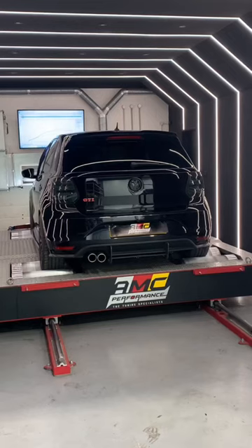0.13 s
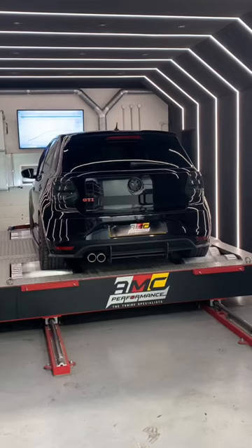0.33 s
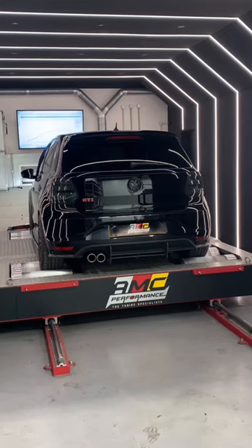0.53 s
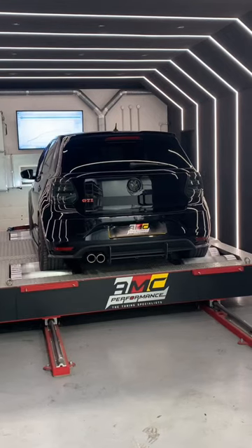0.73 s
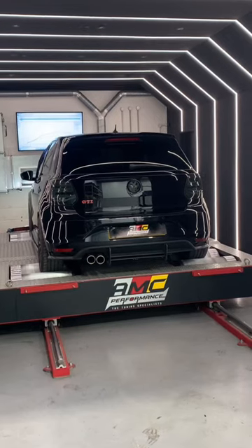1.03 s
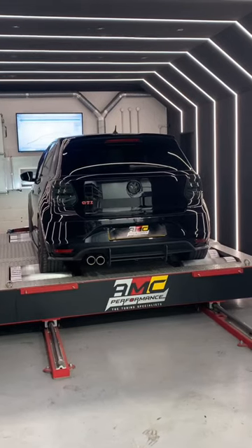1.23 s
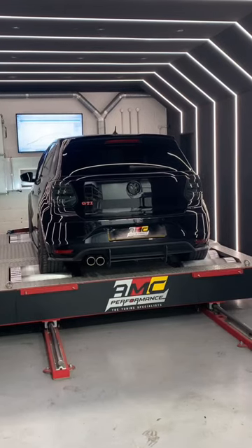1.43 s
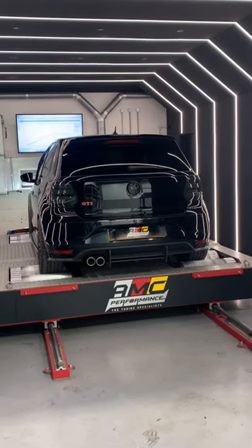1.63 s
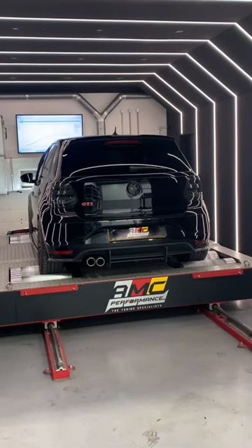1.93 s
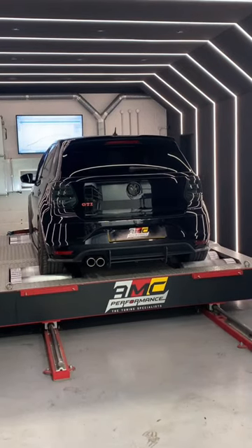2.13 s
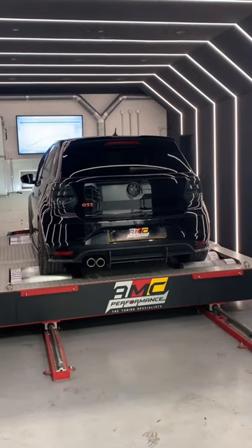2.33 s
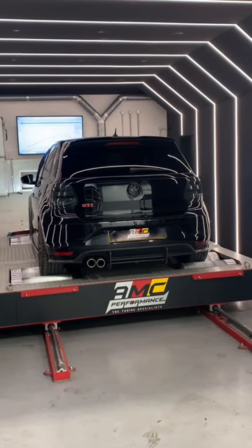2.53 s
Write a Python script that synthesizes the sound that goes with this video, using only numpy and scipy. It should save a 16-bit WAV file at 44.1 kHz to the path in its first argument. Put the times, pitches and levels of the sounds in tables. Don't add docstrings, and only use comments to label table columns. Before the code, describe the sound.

Turbo car exhaust roars upward, pops and burbles between gears, then settles into a quieter drone.

```python
import sys
import numpy as np
from scipy import signal
from scipy.fft import rfft, irfft, next_fast_len
from scipy.io import wavfile
from scipy.ndimage import map_coordinates

SR = 44100
rng = np.random.default_rng(int(sys.argv[2]) if len(sys.argv) > 2 else 0)


def boost(x):
    u = np.asarray(x, float) / 20
    return 10 ** u


def persist_wave(psi):
    counts = np.round(np.clip(psi, -1, 1) * 32767).astype(np.int16)
    wavfile.write(sys.argv[1], SR, np.atleast_2d(counts).T)


N = 119070

# frequency in Hz, density in dB per Hz.
ROAR_SPECTRUM = [(24, -48), (40, -8), (157, -18), (268, 0.5), (386, -5.5), (443, 1.5), (545, -1.5),
                 (648, -4.5), (2500, -13.5), (3250, -30.5), (5500, -120)]
# frequency in Hz, density in dB per Hz.
RASP_SPECTRUM = [(530, -5.5), (900, -9.5), (4540, -6.5), (6010, -11.5), (6950, -13), (9200, -14),
                 (11200, -20.5), (13900, -23.5), (16500, -26)]
# frequency in Hz, density in dB per Hz.
SPIT_SPECTRUM = [(3000, -43), (6000, -2), (11000, 0), (16500, -5)]

ROAR_FROM_HZ, RASP_DB = 200, 6
SPIT_SCATTER_DB, SPIT_SHARE, SPIT_SHARP = 3.5, 0.75, 6.6


def unit(x):
    return x / np.sqrt(np.mean(x ** 2) + 1e-20)


def along(points, hz):
    f, v = np.transpose(points)
    return np.interp(np.log(hz + 1), np.log(f + 1), v)


def curves(rows, fade_s=0.017):
    s, *cols = np.transpose(rows)
    t = np.arange(N) / SR
    gate = np.clip(np.minimum(t - s[0], s[-1] - t) / fade_s + 1, 0, 1)
    return [np.interp(t, s, c) for c in cols] + [gate]


def wobble(rate):
    knots = rng.standard_normal(400)
    coarse = map_coordinates(knots, [np.arange(N // 30 + 1) * 30 * rate / SR])
    return np.repeat(coarse, 30)[:N]


def filtered(x, response):
    m = next_fast_len(N + SR // 2)
    return irfft(rfft(x, m) * response(np.fft.rfftfreq(m, 1 / SR)), m)[..., :N]


def pipe(hz, peaks):
    return boost(sum(db / (1 + (2 * (hz - c) / w) ** 2) for c, w, db in peaks))


def pull(rows, orders):
    # frequency in Hz, width in Hz, gain in dB.
    resonances = [(92.5, 4.8, -13.5), (119, 2.4, 10), (193, 5.5, -9), (278.4, 16, 8.5), (320.8, 4.9, 3),
                  (338.8, 7.1, 6.5), (445.1, 23.4, 12.5), (460, 8.8, 12), (554.2, 3.4, 7), (654, 12.7, 14),
                  (764.2, 7.8, 15.5), (978, 14, 15)]
    # centre in seconds, order, half length in seconds, gain in dB.
    swells = [(0.13, 3, 0.065, -2), (0.24, 2, 0.059, 1.5), (0.404, 3, 0.047, 4.5), (0.38, 4, 0.081, -8.5),
              (0.243, 4, 0.036, 4.5), (0.835, 7, .06, -12), (2.28, 8, 0.051, -9), (1.25, 6, 0.017, 8),
              (0.77, 4, 0.032, -5), (0.78, 6, 0.051, 6.5), (0.93, 7, 0.028, -7.5), (1.012, 3, 0.063, -14),
              (1.075, 4, 0.037, 6.5), (1.132, 3, 0.05, 3), (1.29, 4, 0.053, -14), (1.444, 1, .06, 4),
              (1.71, 3, 0.036, 3), (1.78, 3, 0.028, -12.5), (1.78, 5, 0.035, -6), (2.1, 2, .04, -3.5),
              (2.1, 6, 0.035, 8), (2.327, 2, .04, -8), (2.25, 1, 0.32, 2.5), (2.68, 1, 0.061, -18)]
    hz, hum_db, rasp_db, tilt_db, spit_db, gate = curves(rows)
    turns = np.cumsum(hz) / SR
    t = np.arange(N) / SR
    quarter_turn = np.array([[0], [1]]) / 4
    hum = 0
    for k, db in orders:
        sway_db = 0.5 * np.array([wobble(7.16), wobble(5.8)])
        sway_db = sway_db + 0.55 * k * wobble(23.98)
        for s, order, half_s, gain_db in swells:
            if round(order) == k:
                sway_db = sway_db + gain_db * np.exp(-((t - s) / half_s) ** 2)
        through = pipe(k * hz[::30], resonances)
        through = np.repeat(through / through.mean(), 30)[:N]
        level = boost(db + tilt_db * (np.clip(k, 2, 6) - 2.5) + sway_db) * through
        phase = k * turns + k % 2 / 4 + rng.random() / 4 + quarter_turn
        hum = hum + level * np.cos(2 * np.pi * phase + 0.11 * wobble(30.15))

    roar = cell(gas(ROAR_SPECTRUM, turns, 0, 0.077, from_hz=ROAR_FROM_HZ))
    roar = boost(-27 + 0.73 * (rasp_db + 32.5)) * roar
    rasp = cell(gas(RASP_SPECTRUM, turns, 0, 0.27, snap=1.5, from_hz=ROAR_FROM_HZ))
    rasp = boost(RASP_DB) * (rasp + boost(-7.5) * buzz(turns, hz, gate > 0))
    spit = gas(SPIT_SPECTRUM, turns, SPIT_SCATTER_DB, SPIT_SHARE, sharp=SPIT_SHARP)
    spit = boost(-6 + spit_db) * spit
    return gate * (boost(hum_db + 4.5) * hum + roar + boost(rasp_db + wobble(13.85)) * (rasp + spit))


def buzz(turns, hz, on):
    # frequency in Hz, level in dB.
    order_levels = [(1000, -25.5), (1450, -1.5), (1750, -0.5), (2400, -4.5), (3500, -8.5)]
    out = np.zeros((2, N))
    phase_spread = [[0.35], [1]]
    for k in range(10, 33):
        level = boost(along(order_levels, k * hz[on]) + 6 * wobble(9.09)[on])
        phase = k * turns[on] + rng.random((2, 1)) * phase_spread
        out[:, on] += level * np.cos(2 * np.pi * phase)
    return out / np.sqrt(np.mean(out[:, on] ** 2))


def gas(spectrum, turns, scatter_db, share, snap=0, sharp=2.7, from_hz=30):
    # frequency in Hz, width in Hz, gain in dB.
    tip_resonances = [(1550, 450, 4), (3600, 600, 2.5), (6800, 1500, 2)]
    count = np.floor(turns).astype(int)
    size = boost(scatter_db * rng.standard_normal(600))[count % 600]
    size = size * (1 - 0.061 * (count % 2))
    puff = share * unit(size * np.exp(-sharp * (turns - count))) + 1 - share
    gust = puff * rng.standard_normal((2, N))
    gust[0] += snap * size * np.diff(count, prepend=0)

    def response(hz):
        low_cut = 1 + (from_hz / (hz + 1)) ** 6
        return boost(along(spectrum, hz)) * pipe(hz, tip_resonances) / low_cut

    return unit(filtered(gust, response))


def cut(rows):
    scatter_db, share = 2.5, 0.4
    hz, burble_db, rasp_db, gate = curves(rows, fade_s=0.0053)
    turns = np.cumsum(hz * (1 + 0.15 * wobble(60))) / SR
    since = np.maximum(np.arange(N) / SR - rows[0][0], 0)
    hum = boost(-1 - 60 * since / 0.58) * np.sin(4 * np.pi * np.cumsum(hz) / SR)
    low = boost(burble_db - 2.5) * (gas(ROAR_SPECTRUM, turns, scatter_db, share) + hum)
    rasp = gas(RASP_SPECTRUM, turns, scatter_db, share)
    spit = gas(SPIT_SPECTRUM, turns, SPIT_SCATTER_DB, SPIT_SHARE, sharp=SPIT_SHARP)
    return gate * (low + boost(rasp_db + RASP_DB) * (rasp + boost(-8) * spit))


def pops():
    # start in seconds, crack level in dB, thump level in dB.
    fuel_pops = [(0.0387, -28, -26), (0.424, -9, -46), (0.4556, -3.5, -19), (0.496, -33, -44),
                 (0.5526, -9, -20), (0.571, -24, -20), (0.6658, -18, -18), (0.6813, -19, -19),
                 (0.788, -10, -20.5), (0.9959, -10, -23), (1.52, -22, -16), (1.5373, -25, -10.5),
                 (1.558, -7, -21), (1.575, -3.5, -18), (1.59, -14, -20.5), (1.6176, -18, -13.5),
                 (1.6356, -30, -20.5), (1.659, -18, -39)]
    # frequency in Hz, level in dB, t60 in seconds.
    silencer_modes = [(59.4, -5, 0.16), (79, -1, 0.11), (157.7, -5, 0.098), (266, 12.5, 0.014)]
    crack_t60_s, rise_s = 0.016, 0.0075
    cracks, thumps = np.zeros((2, N + SR)), np.zeros((2, N + SR))
    t = np.arange(SR // 4) / SR
    for s, crack_db, thump_db in fuel_pops:
        at = slice(round(s * SR), round(s * SR) + len(t))
        cracks[:, at] += boost(crack_db - 3 - 60 * t / crack_t60_s) * rng.standard_normal((2, len(t)))
        ring = 0
        for hz, db, t60 in silencer_modes:
            ring = ring + boost(db + rng.normal(0, 2.0) - 60 * t / t60) * np.sin(2 * np.pi * hz * t)
        thumps[:, at] += boost(thump_db + 7) * (1 - np.exp(-t / rise_s)) * ring
    cracks = filtered(cracks[:, :N], lambda hz: boost(along(RASP_SPECTRUM, hz) + 4.0))
    return cracks, thumps[:, :N] * [[1], [0]]


def ticks():
    # start in seconds, peak in dB, a frequency in Hz the clicks do not
    pipe_ticks = [(0.0444, -32, 4000), (0.09, -50, 8000), (0.12, -50, 8000), (0.622, -11.5, 4000),
                  (0.6494, -32, 4000), (0.6659, -10.5, 4000), (0.685, -30, 4000), (0.9148, -14, 4000),
                  (0.9238, -13, 4000), (0.9418, -12, 4000), (0.9524, -14, 4000), (1.0595, -16, 8000),
                  (1.4865, -18, 4000), (1.5034, -28, 8000), (1.5199, -8, 4000), (1.538, -20, 4000),
                  (1.9694, -51, 8000), (2.01, -51, 8000), (2.3994, -31, 4800)]
    t60_s, from_hz = 0.0065, 3200
    out = np.zeros((2, N + SR))
    t = np.arange(SR // 50) / SR
    for s, db, _ in pipe_ticks:
        click = boost(db - 3.5 - 60 * t / t60_s) * rng.standard_normal((2, len(t)))
        out[:, round(s * SR):][:, :len(t)] += click
    return filtered(out[:, :N], lambda hz: 1j * hz / (from_hz + 1j * hz))


def cell(pair):
    t60_s, wet_db = 0.33, -3
    t = np.arange(SR // 2) / SR
    tail = rng.standard_normal(len(t)) * boost(-60 * t / t60_s)
    wet = signal.fftconvolve(pair, tail[None] / np.linalg.norm(tail), axes=1)[:, :N]
    return (pair + boost(wet_db) * wet) / np.sqrt(1 + boost(2 * wet_db))


def ports(pair):
    # frequency in Hz, left lead in radians.
    left_lead = [(0, 0), (600, -.3), (2000, 1.6), (4100, 2.05), (4700, np.pi), (6850, 2 * np.pi),
                 (9000, 3 * np.pi), (17300, 7 * np.pi)]
    # frequency in Hz, left-right likeness from 0 to 1.
    likeness = [(60, .94), (300, .8), (700, .5), (2000, .5), (3500, .86), (15000, .96)]
    # frequency in Hz, left over right in dB.
    left_lean = [(60, 4), (180, 1), (550, -2), (1650, -2.5), (4970, 2.5), (15000, -1.5)]
    f, turn = np.transpose(left_lead)

    def direct_and_reflected(hz):
        angle = np.arccos(np.clip(along(likeness, hz), 0, 1)) / 2
        return np.array([np.cos(angle), np.sin(angle)])

    near, far = filtered(pair, direct_and_reflected)
    side = np.array([[0.5], [-0.5]])
    return filtered(np.array([near + far, near - far]),
                    lambda hz: boost(side * along(left_lean, hz)) * np.exp(1j * side * np.interp(hz, f, turn)))


def scene():
    # time in seconds, firing rate in Hz, hum in dB, rasp in dB, load tilt in dB per order,
    # spit over rasp in dB.
    gears = [
        [(0.036, 125.5, -23.5, -29.5, -4, -10), (0.042, 125.8, -21, -34.5, -1.5, -17),
         (0.172, 132.2, -23.5, -33, -1, -11), (0.218, 132, -24, -33, 2.7, -11),
         (0.304, 139.6, -21.5, -31.5, 1.5, -14), (0.35, 141.2, -19.5, -30, 3.5, -6),
         (0.382, 142.3, -18, -28, 4, -11), (0.426, 147.3, -16, -25.5, 1.6, -3),
         (0.45, 140.8, -32, -34, 7.5, -17)],
        [(0.66, 110.2, -32, -29.5, -15, -5), (0.674, 107.6, -22.5, -24, -0.8, 5),
         (0.924, 108.8, -25, -29.5, -0.22, 7), (1.054, 110.6, -30.5, -30.5, -0.1, 9.5),
         (1.19, 112.4, -32.5, -31.5, -0.7, 1), (1.318, 115.7, -36, -37.5, 0.6, -13),
         (1.406, 115.7, -37, -42.5, -1.8, -17), (1.476, 120.8, -37.5, -41.5, 0.1, -10),
         (1.53, 116.2, -33.5, -35.5, 0, -8)],
        [(1.64, 98.98, -53.5, -32, 9, -8), (1.678, 94.12, -35.5, -36, -1.5, 0),
         (1.81, 91.35, -35, -36.5, -0.1, -3), (1.95, 92.76, -35.5, -40, -1, -14),
         (2.13, 95.02, -34.5, -38, 0.4, -10), (2.3, 95.8, -35, -43.5, -0.9, -20),
         (2.478, 98.44, -34, -44, -2.1, -16), (2.53, 102.9, -37, -45.5, -0.5, -16),
         (2.7, 103.3, -29, -44.5, -6, -16)],
    ]
    # multiple of the firing rate, level in dB.
    first_orders = [(1, -8.5), (1.5, -16), (2.5, -14), (3.5, -22), (4.5, -23), (2, 2.5), (3, -11.5),
                    (4, -9.5), (5, -18.5), (6, -23), (7, -20.5), (8, -55), (9, -28.5)]
    # multiple of the firing rate, level in dB.
    second_orders = [(1, -10), (2, -0.5), (3, -1.5), (4, 3), (5, -9), (6, -4), (7, -6.5), (8, -12),
                     (9, -20)]
    # multiple of the firing rate, level in dB.
    third_orders = [(1, -8), (3.5, -11), (2, -1), (3, 0), (4, -8.5), (5, -8.5), (6, -6), (7, -10.5),
                    (8, -13), (10, -42)]
    # time in seconds, firing rate in Hz, burble in dB, rasp in dB.
    spark_cuts = [
        [(0.43, 102.6, -15.5, -26), (0.466, 102.7, -14.5, -27.5), (0.502, 102, -12.5, -25.5),
         (0.644, 102.8, -18.5, -30.5), (0.678, 99, -23, -33), (0.69, 99, -27, -39)],
        [(1.5215, 102.1, -16, -22.5), (1.525, 101.9, -18.5, -27), (1.597, 107.4, -16.5, -28),
         (1.627, 102.7, -26, -31.5), (1.713, 94.4, -26.5, -42), (1.76, 99.5, -39, -38)],
    ]
    all_orders = (first_orders, second_orders, third_orders)
    engine = sum(pull(rows, orders) for rows, orders in zip(gears, all_orders))
    burble = sum(cut(rows) for rows in spark_cuts)
    cracks, thumps = pops()
    cracks = cracks + ticks()
    return ports(engine + burble + cracks + thumps) + boost(-3.5) * cracks[::-1]


def band_limit(x):
    return signal.sosfilt(signal.butter(12, 16810, fs=SR, output="sos"), x)


def record(dry):
    start_s, top_hz, ceiling = 0.0375, 15900, 0.97
    x = filtered(dry, lambda hz: (hz < top_hz) * hz ** 2 / (hz ** 2 + 35 ** 2))
    x = x * (np.arange(N) > start_s * SR)
    x = x / (1 + abs(x / ceiling) ** 6) ** (1 / 6)
    return band_limit(x)


dry = scene()
out = record(dry)
persist_wave(out)
```